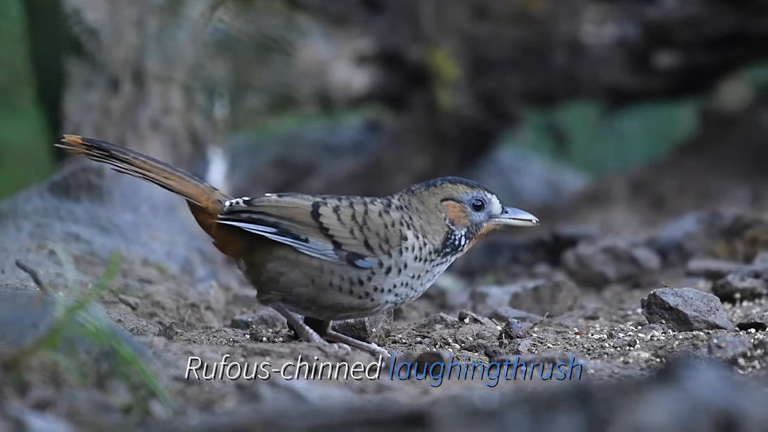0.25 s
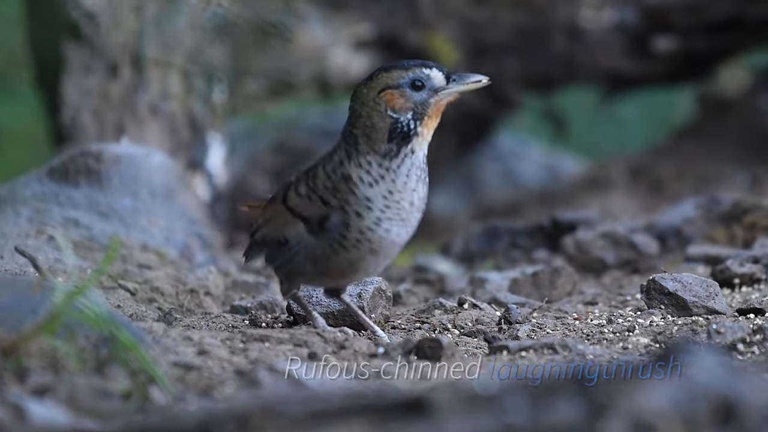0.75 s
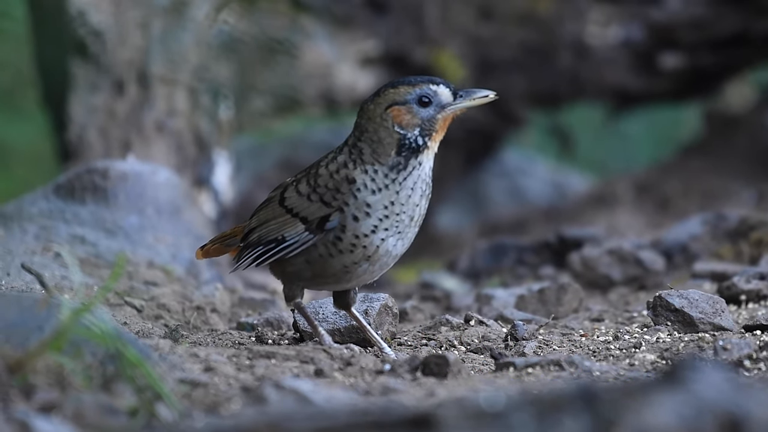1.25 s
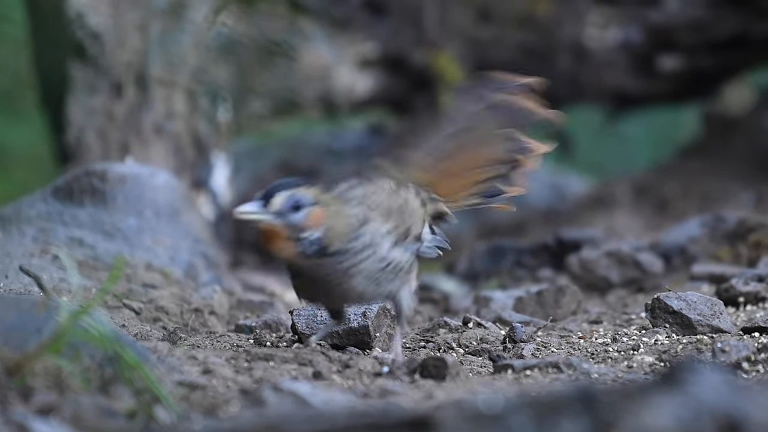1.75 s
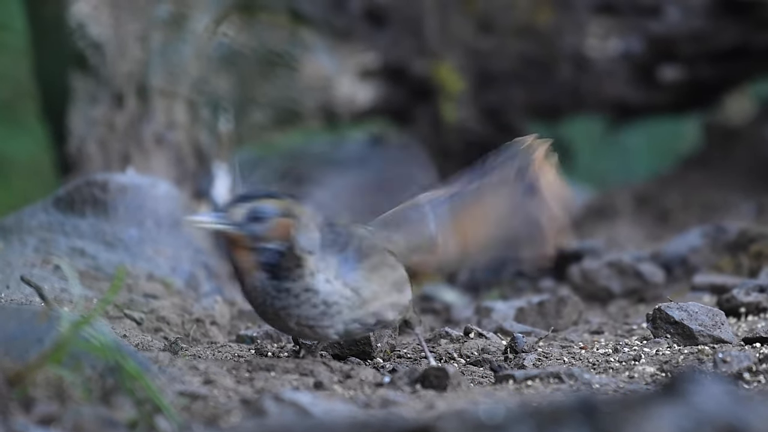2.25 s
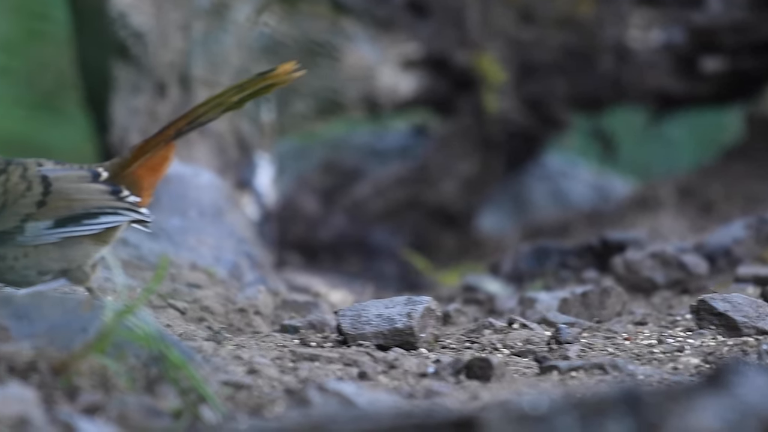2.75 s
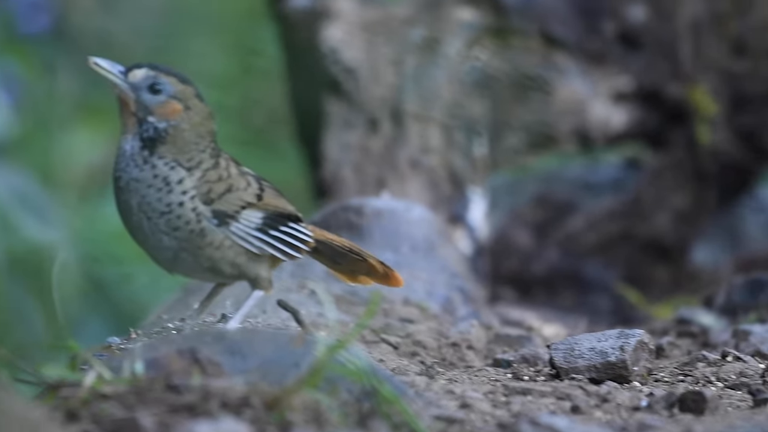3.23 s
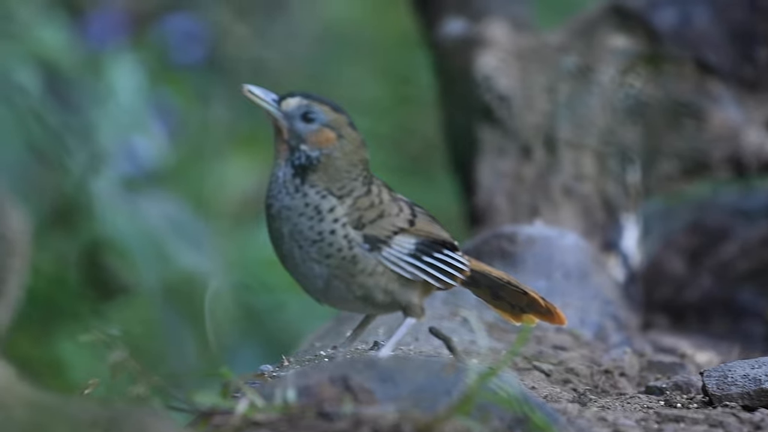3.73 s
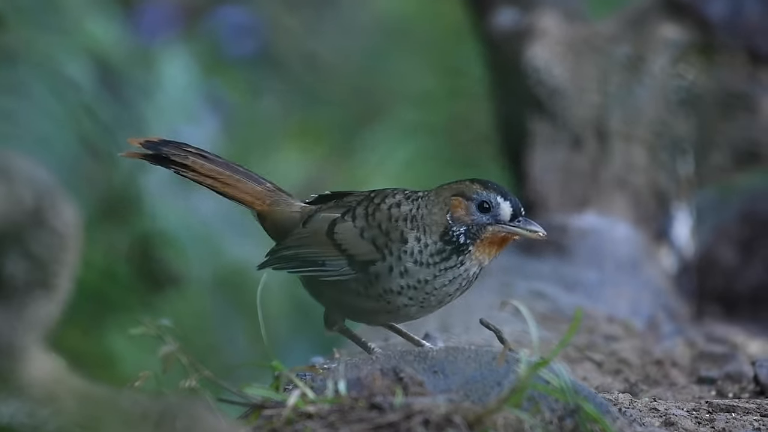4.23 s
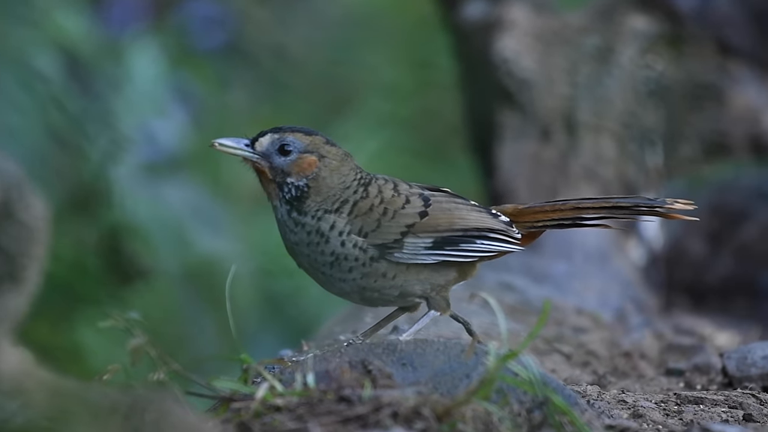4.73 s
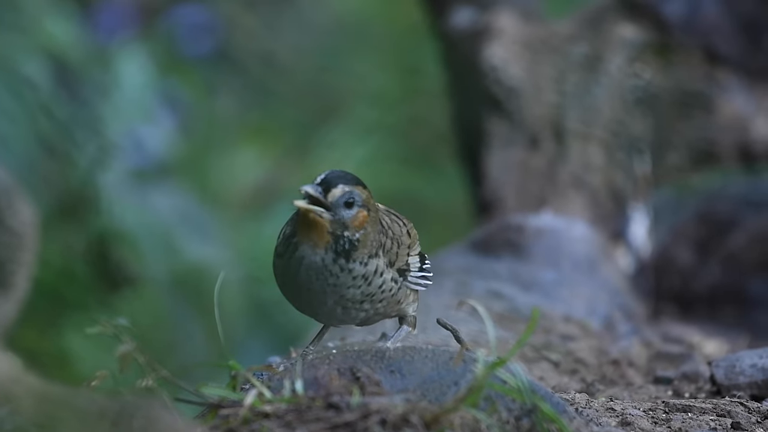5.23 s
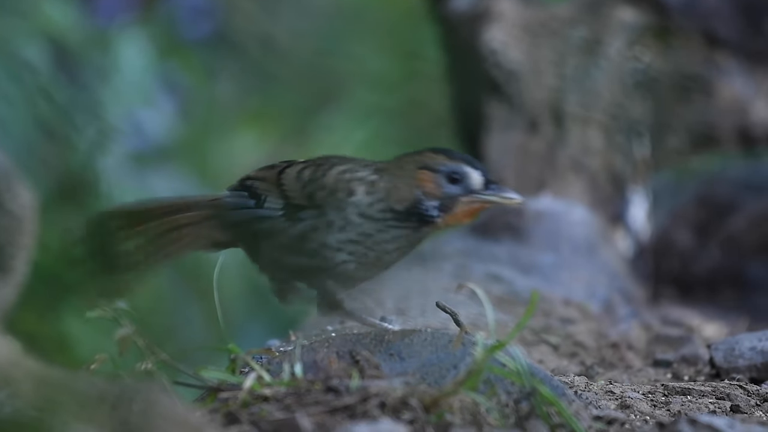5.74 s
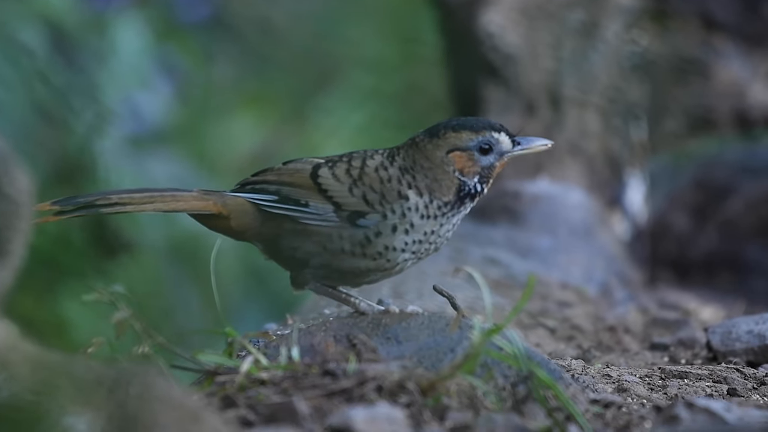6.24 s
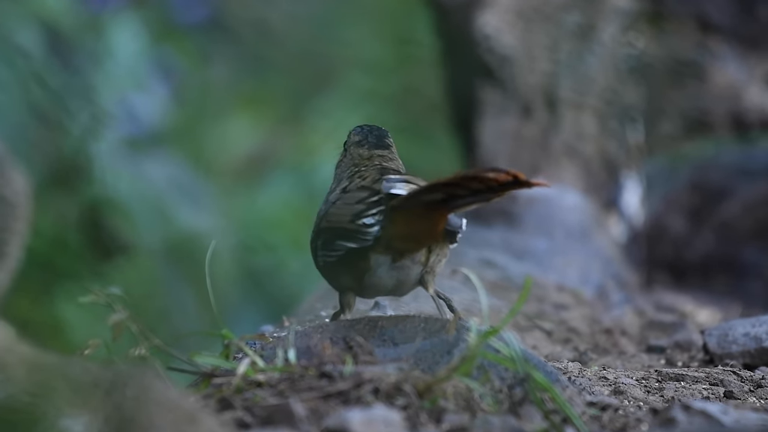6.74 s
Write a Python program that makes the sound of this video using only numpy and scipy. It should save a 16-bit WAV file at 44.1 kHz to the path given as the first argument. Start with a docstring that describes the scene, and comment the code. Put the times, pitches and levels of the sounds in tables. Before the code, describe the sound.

Close outdoor stereo sound of a scolding bird on stony ground. Nasal, grating buzzes of about a fifth of a second come in a bout of four, then after a gap a run of seven or more. Between and around them another bird answers with quick warbling trills that open into a hiss. Wings puff softly, grit scuffs, small stones tick, and dull hollow knocks sit under a faint murmur and hum.

```python
"""Scolding laughingthrush in a wood

A laughingthrush on stony ground scolds in bouts of harsh buzzing calls: pulse trains and gated turbulence, shaped by
the resonances of the throat. A second bird answers with trills, a flicked whistle beside a climbing band of noise;
gliding tones whistle far off. Feet scuff grit (dense noise grains), pebbles and small ticks ring (decaying modes),
wings thump (puffs of noise and tone), and hollow knocks (single modes) sound over filtered air noise and a low hum.
"""
import sys
import numpy as np
from scipy import signal
from scipy.fft import rfft, irfft, next_fast_len
from scipy.io import wavfile
from scipy.ndimage import uniform_filter1d, map_coordinates

SR = 44100
rng = np.random.default_rng(int(sys.argv[2]) if len(sys.argv) > 2 else 0)


def wav_out(sig):
    """Save sig, one row per channel (or a flat mono array), as 16-bit PCM at SR to the path in sys.argv[1]."""
    wavfile.write(sys.argv[1], SR, np.round(np.clip(np.atleast_2d(sig).T, -1, 1) * 32767).astype(np.int16))


N = 307818
T = np.arange(N) / SR  # time of every sample, s

# Scolding calls, one row each. The tops lie at a share (0-1) of the length, held within 0.1-0.9.
# start_s, length_s, top_rate_hz (pulses), start_sag_hz, end_sag_hz, rate_top_share, loudest_share,
# main_db, upper_db, middle_db, low_db, overtones_db (relative band levels),
# brightening_db (change of the upper band over the call), shoulder_db (against the middle band)
SCOLDING_CALLS = [(-.2, 0.24, 141.9, 22.8, 16, 0.52, 0.53, -28.5, -27.5, -39, -47, -46, -3, 3.2),
                  (1.097, 0.25, 140.5, 15.3, 9.66, 0.62, 0.78, -28, -23.5, -36, -40, -45, -2.5, 3.7),
                  (1.43, 0.22, 138.9, 25.6, 16.8, .54, 0.66, -28, -25.5, -37.5, -43, -46, -5.5, 2.3),
                  (1.772, 0.2, 142.9, 17.2, 9.73, 0.65, 0.73, -29, -30.5, -40.5, -43, -48.5, 0, 3),
                  (2.097, 0.2, 146.7, 23.8, 18, 0.58, .55, -29.5, -30, -39.5, -45, -47, 0, 3),
                  (4.249, 0.23, 138.9, 24, 10, 0.62, 0.93, -43, -27, -32.5, -40.5, -46, -6.5, 0.65),
                  (4.554, 0.22, 138.9, 24.2, 17.8, 0.66, 0.66, -37, -28.5, -35, -41, -45, -3.5, 2.04),
                  (4.876, 0.21, 136.5, 23, 14.5, 0.59, 0.71, -47, -28.5, -35, -42, -46.5, -2.5, 1),
                  (5.215, .215, 141.4, 25.8, 15, .48, 0.24, -29.5, -33.5, -39.5, -41.5, -46, 5, 2),
                  (5.611, .229, 148.9, 23, 11.84, .64, 0.84, -36, -35, -41.5, -41.5, -48, 10.5, 4.12),
                  (5.948, 0.21, 147.3, 21.6, 19.5, 0.61, 0.66, -36.5, -30.5, -38.5, -41, -47.5, 1, 3.9),
                  (6.315, 0.22, 144.6, 33, 17.5, .58, 0.61, -30.5, -25, -34, -47.5, -44.5, 1, 3.04),
                  (6.669, 0.24, 144.6, 29, 11.6, 0.69, 0.68, -27.5, -27, -35.5, -50.5, -45, -1.5, 2.5)]


def amp(db):
    """Amplitude ratio of a level in dB: twenty dB to a factor of ten."""
    return 10 ** (np.asarray(db) / 20)


def unit(x):
    """Normalization to a root-mean-square value of one."""
    return x / np.sqrt(np.mean(x ** 2) + 1e-20)


def along(points, hz):
    """Interpolation of (frequency_hz, value) points along a logarithmic frequency axis."""
    f, v = np.transpose(points)
    return np.interp(np.log(hz + 1), np.log(f + 1), v)


def wobble(rate):
    """Band-limited random modulation: a smooth curve through `rate` random knots a second."""
    knots = rng.standard_normal(int(N * rate / SR) + 4)
    return map_coordinates(knots, [T * rate])


def filtered(x, response):
    """Linear filtering: the spectrum of x times a complex response of frequency."""
    m = next_fast_len(N + SR // 2)
    return irfft(rfft(x, m) * response(np.fft.rfftfreq(m, 1 / SR)), m)[..., :N]


def causal(gain):
    """Minimum-phase response with this gain, by folding the cepstrum onto positive times."""
    c = irfft(np.log(gain + 1e-6))
    c[1:len(c) // 2] *= 2
    c[len(c) // 2 + 1:] = 0
    return np.exp(rfft(c))


def bell(hz, centre_hz, width_hz):
    """Lorentzian power curve of a single damped resonance."""
    return 1 / (1 + (2 * (hz - centre_hz) / width_hz) ** 2)


def add(out, s, sound, pan_db):
    """Stereo placement by level difference: left over right is pan_db."""
    part = out[:, round(s * SR):][:, :len(sound)]
    part += amp([[pan_db / 2], [-pan_db / 2]]) * sound[:part.shape[1]]


def scattered(x, t60, channels):
    """Near-field scattering: x convolved with a short burst of decaying noise."""
    t = np.arange(SR // 20) / SR
    tail = rng.standard_normal((channels, len(t))) * amp(-60 * t / t60)
    return signal.fftconvolve(x[None], tail / np.linalg.norm(tail[0]), axes=1)[:, :N]


def echoes(x, delay_s):
    """Reverberation: trunks and rocks scatter the sound, and each frequency decays at its own speed."""
    # Decay of the wood: frequency_hz, t60_s
    decay_times = [(500, 0.68), (2200, 0.44), (6000, 0.54), (12000, 0.68)]
    hz, t, z = signal.stft(rng.standard_normal((2, SR // 2)), SR, nperseg=256)
    decay = amp(-60 * t / along(decay_times, hz)[:, None])
    tail = signal.istft(z * decay, SR, nperseg=256)[1]
    delayed = np.pad(x, (round(delay_s * SR), 0))
    return signal.fftconvolve(delayed[None], tail / np.linalg.norm(tail[0]), axes=1)[:, :N]


def murmur(level_db=-61, patchy_db=.8):
    """Diffuse field: the wood's noise is coherent between the two ports only in the bass."""
    # Spectrum of the murmur: frequency_hz, level_db (relative)
    spectrum = [(25, -24), (40, -8.5), (107, -4.5), (180, -11), (267, -6.5), (400, -13), (600, -11.5),
                (1100, -18), (3000, -22.5), (6800, -28.5), (8500, -40), (12000, -36), (15700, -47)]
    # Coherence of the ports: frequency_hz, left_right_likeness (-1 to 1)
    likeness = [(60, 0.97), (190, 0.9), (620, 0.49), (1980, 0.1), (6370, 0.057)]
    z = signal.stft(rng.standard_normal((2, N)), nperseg=512)[2]
    # smoothed over frequency, then over time
    field = uniform_filter1d(rng.standard_normal(z.shape[1:]), size=6, axis=0)
    field = uniform_filter1d(field, size=14, axis=1)
    pair = signal.istft(z * amp(patchy_db * unit(field)), nperseg=512)[1][:, :N]

    def mid_side_gains(f):
        angle = np.arccos(np.clip(along(likeness, f), -1, 1)) / 2
        return amp(along(spectrum, f)) * [np.cos(angle), np.sin(angle)]

    mid, side = filtered(pair, mid_side_gains)
    return amp(level_db) * np.array([mid + side, mid - side]) / np.std(mid)


def low_hum():
    """Narrow-band noise: a resonance passes a low hum whose level wavers slowly."""
    # Hum: centre_hz, width_hz, level_db (mean)
    hum_bands = [(119.2, 13, -66.5)]
    hum = np.zeros(N)
    for centre_hz, width_hz, db in hum_bands:
        band = filtered(rng.standard_normal(N), lambda f: bell(f, centre_hz, width_hz))
        hum += amp(db + wobble(0.71)) * unit(band)
    return hum


def far_birds():
    """Frequency glides: short pure whistles, with a quaver on those that fall through 3200 Hz."""
    # Far whistles: start_s, end_s, start_pitch_hz, end_pitch_hz, level_db (relative)
    whistles = [(.5, 0.62, 3210, 3040, -69), (3.098, 3.133, 4780, 5000, -68),
                (3.43, 3.491, 5460, 5300, -73), (3.489, 3.547, 4980, 4410, -74),
                (3.51, 3.545, 5300, 4900, -74), (3.564, 3.602, 8200, 7850, -91),
                (3.566, 3.607, 3500, 3070, -63), (3.57, 3.625, 2740, 2750, -72),
                (3.61, 3.636, 7700, 6200, -69), (3.688, 3.706, 7000, 7250, -68),
                (3.883, 3.92, 6700, 6400, -79), (3.976, 4.001, 6960, 6600, -75)]
    voice = np.zeros((2, N))
    for start, end, first_hz, last_hz, db in whistles:
        u = np.linspace(0, 1, round((end - start) * SR))
        pitch_hz = first_hz + (last_hz - first_hz) * u ** 1.5
        if last_hz < 3200 < first_hz:
            pitch_hz = pitch_hz + 120 * np.sin(2 * np.pi * 90 * (end - start) * u)
        tone = np.sin(2 * np.pi * np.cumsum(pitch_hz) / SR)
        add(voice, start, amp(db + 3.5) * np.sin(np.pi * u) * tone, 0)
    return voice + amp(-13) * echoes(voice[0], delay_s=0.01)


def hollow_knocks():
    """Modal decay: each knock is one hollow mode with a softened start."""
    # Knocks: start_s, level_db (relative), pitch_hz, t60_s
    knock_rows = [(0.019, -51, 205, 0.25), (0.533, -48.5, 210, 0.15), (0.869, -50, 215, 0.29),
                  (1.161, -47.5, 210, 0.26), (1.449, -47, 217, 0.27), (1.713, -47.5, 213.2, 0.16),
                  (1.969, -45.5, 213.5, 0.098), (2.686, -49, 217, 0.24), (2.96, -48.5, 214, 0.17),
                  (3.159, -50.5, 810, 0.07), (3.273, -40, 850, 0.022), (6.5047, -36, 1031, 0.16),
                  (6.5591, -54, 1018, 0.12)]
    out, t = np.zeros((2, N)), np.arange(SR // 2) / SR
    for s, db, hz, t60 in knock_rows:
        envelope = amp(db + 1.5 - 60 * t / t60) * (1 - np.exp(-t / 0.0012))
        add(out, s, envelope * np.sin(2 * np.pi * hz * t), -1)
    return out


def wing_beats():
    """Displaced air: each beat pushes a soft puff, heard as a decaying low tone with band noise."""
    # Beats: time_s, level_db (relative), pitch_hz
    beat_rows = [(2.279, -48.5, 519), (2.309, -48.5, 254.6), (2.35, -48, 500), (2.38, -46, 543),
                 (2.399, -47, 527.6), (3.763, -50, 356), (3.805, -49, 252), (4.175, -38, 363.6),
                 (4.195, -35.5, 503), (5.218, -37.5, 288), (5.235, -46, 282.7), (5.257, -47, 211.5)]
    out, t = np.zeros((2, N)), np.arange(SR // 2) / SR
    puff_band = signal.butter(3, [120, 600], "band", fs=SR, output="sos")
    for s, db, hz in beat_rows:
        puff = unit(signal.sosfilt(puff_band, rng.standard_normal(len(t))))
        envelope = amp(db + 4 - 60 * t / 0.07) * (1 - np.exp(-t / 0.009))
        add(out, s - .004, envelope * (np.sin(2 * np.pi * hz * t) + 0.9 * puff), -1)
    return out


def ticks():
    """Shared modes: every tick rings one set of resonances, with a brief noisy rattle."""
    # Ticks: start_s, level_db (relative), left_right_db
    tick_rows = [(3.8647, -34, 10), (3.913, -41, -3), (3.9457, -36.5, 3.5), (4.01, -30.5, 9.5),
                 (4.0928, -38.5, 25), (4.1391, -30, 14), (4.175, -30, 10), (4.1996, -30, 7)]
    # Modes of a tick: pitch_hz, level_db (relative), t60_s
    modes = [(4610, 10.5, 0.026), (5570, 3.5, 0.025), (5950, 6.5, 0.016), (11450, -21, 0.0092)]
    out, t = np.zeros((2, N)), np.arange(SR // 8) / SR
    for s, db, pan in tick_rows:
        ring = np.zeros(len(t))
        for hz, mode_db, t60 in modes:
            ring += amp(mode_db - 60 * t / t60) * np.sin(2 * np.pi * (hz * t + rng.random()))
        rattle = signal.lfilter([1, 0, -1], [1, -1.1, .6], rng.standard_normal(len(t)))
        rattle = rattle * amp(-60 * t / .022)
        add(out, s, amp(db - 17) * (0.92 * ring + 0.11 * rattle), pan)
    return out


def pebbles():
    """Impact excitation: knocked stones crack and ring for a moment in two inharmonic modes."""
    # Pebbles: start_s, level_db (relative), ring_hz, left_right_db
    pebble_rows = [(1.0526, -35, 5140, 20), (2.547, -38, 4900, 6), (2.635, -38.5, 5860, -5),
                   (2.644, -37, 5430, 5), (2.6588, -48, 2320, -25), (2.6943, -40.5, 2080, -18),
                   (2.7366, -44, 4630, -8), (2.763, -47, 2340, -26), (2.77, -39.5, 5900, -9),
                   (2.7874, -44, 5470, -11), (2.816, -51, 2340, -20), (2.8314, -49, 5430, -4.5),
                   (2.9, -52, 2390, -10), (2.9091, -44.5, 2200, -25.5), (3.0053, -36, 2070, -14),
                   (3.1173, -47.5, 1660, -21), (3.2766, -44.5, 3730, -9), (3.4031, -44, 4950, 12),
                   (3.7641, -40, 1834, -10), (5.201, -31.5, 3910, -11), (5.2385, -16, 4047, -8.5)]
    overtone_ratio, overtone_db = 1.33, -1  # second mode over the first
    out, t = np.zeros((2, N)), np.arange(SR // 8) / SR
    for s, db, hz, pan in pebble_rows:
        crack = signal.lfilter([1, 0, -1], [1, -1.1, .5], rng.standard_normal(len(t)))
        crack = crack * amp(-60 * t / 0.014)
        ring = np.sin(2 * np.pi * hz * t) + amp(overtone_db) * np.sin(2 * np.pi * overtone_ratio * hz * t)
        add(out, s, amp(db) * (0.077 * crack + ring * amp(-60 * t / 0.0076)), pan)
    return out


def hits():
    """Superposition of direct and reverberant sound for the pebbles and the ticks."""
    out = pebbles() + ticks()
    return out + amp(-18) * echoes(out.mean(0), delay_s=.002)


def scuffs(spiky_db=3):
    """Granular friction: feet drag through grit, a dense spray of tiny unequal grains."""
    # Scuffs: loudest_s, level_db, rise_db_per_s, fall_db_per_s
    scuff_rows = [(2.575, -52.5, 1500, 110), (2.637, -50, 1500, 190), (2.695, -46, 900, 900),
                  (2.736, -50.5, 2500, 480), (2.763, -46.5, 2000, 200), (3.404, -45.5, 2500, 520),
                  (3.72, -50, 3004, 60), (3.775, -50, 208, 170)]
    # Spectrum of grit: frequency_hz, level_db (relative)
    spectrum = [(400, -22), (700, -22), (1100, -21.5), (2000, -10), (2600, -19), (5300, -12.5), (6900, -15),
                (8800, -29.5), (11000, -36.5), (15700, -48)]
    level = sum(amp(db - np.where(T < s, rise * (s - T), fall * (T - s))) for s, db, rise, fall in scuff_rows)
    shared, left, right = rng.standard_normal((3, N))
    unevenness = amp(spiky_db * wobble(500) + 2.2 * wobble(60))
    grains = (shared + 3 * np.array([left, right])) * unevenness
    return level * unit(filtered(grains, lambda f: amp(along(spectrum, f))))


def breath_gate(t, length, attack_s, release_db_per_s):
    """Exponential onset and decay: opens fast at t = 0, holds, then dies away."""
    return (1 - np.exp(-np.maximum(t, 0) / attack_s)) * amp(-release_db_per_s * np.maximum(t - length, 0))


def trill_controls():
    """Articulation: the opening beak lifts and strengthens the rasp while the flicks slow down."""
    # Trills; a positive settling_db weakens the warble away from its accent, a negative one strengthens it:
    # start_s, length_s, warble_db (relative), settling_db, start_pitch_hz (before scoop and flicks),
    # flick_rate_hz (at the start), first_flick_head_start (0-1), rasp_db (relative, beak open), opening_s
    trill_rows = [(0.246, 0.25, -49.5, 3, 1797, 51.5, 0.24, -49.5, 0.2),
                  (0.747, .329, -43, 7.5, 2008, 58.6, .45, -43.5, 0.23),
                  (2.309, 0.24, -37, 9, 1956, 48, 0.36, -45.5, .25),
                  (3.115, 0.22, -45, 7, 1792, 50.5, 0.3, -46, 0.36),
                  (3.883, 0.29, -43, 9, 1888, 48.4, 0.23, -50, .26),
                  (5.118, .095, -42, -2, 1949, 57.2, 0.35, -37, 0.26),
                  (6.581, 0.094, -43.5, -4, 1993, 46.6, 0.46, -53, .25)]
    attack_s, release_db_per_s = 0.011, 900
    warble_top_hz, climb_s = 2255, .15
    scoop_hz, scoop_s = 398, .012  # the warble slides up into its first pitch
    rasp_shut_hz, rasp_open_hz, rasp_shut_loss_db = 2707, 4925, 26  # band centres and level by beak
    slowing_per_s2 = 20  # the flick rate falls by this many a second, every second
    accent_at_s, accent_s = .035, 0.063
    out = np.zeros((5, N)) + [[0], [0], [rasp_shut_hz], [warble_top_hz], [0]]
    for start, length, warble_db, settle_db, first_hz, rate, head, rasp_db, open_s in trill_rows:
        near = (T > start) & (T < start + length + .05)
        t = T[near] - start
        gate = breath_gate(t, length, attack_s, release_db_per_s)
        beak = np.minimum(t / open_s, 1)
        away_from_accent = 1 - np.exp(-((t - accent_at_s) / accent_s) ** 2)
        warble_gain = gate * amp(warble_db - settle_db * away_from_accent)
        rasp_gain = gate * amp(rasp_db - rasp_shut_loss_db * (1 - beak) ** 2)
        rasp_hz = rasp_shut_hz + (rasp_open_hz - rasp_shut_hz) * beak
        warble_hz = warble_top_hz - (warble_top_hz - first_hz) * np.exp(-t / climb_s)
        warble_hz -= scoop_hz * np.exp(-t / scoop_s)
        flicks = head + rate * t - slowing_per_s2 * t ** 2 / 2
        out[:, near] = [warble_gain, rasp_gain, rasp_hz, warble_hz, flicks]
    return out


def trill(swing=0.31, rasp_width_hz=1150):
    """Two-voiced syrinx: one side flicks a rough whistle up and down, the other rasps in a climbing band."""
    warble_gain, rasp_gain, rasp_hz, warble_hz, flicks = trill_controls()
    opening = np.clip((rasp_hz - 2800) / 2000, 0, 1)
    flick = np.sin(np.pi * flicks) ** 2

    pitch_hz = warble_hz * (1 + swing * (.8 + .45 * opening) * (flick ** 2 - .6)) + 100 * wobble(400)
    whistle = np.sin(2 * np.pi * np.cumsum(pitch_hz) / SR)
    hoarse = filtered(rng.standard_normal(N), lambda f: bell(f, 0, 1800) ** 2)
    rough_whistle = amp(1.6 * wobble(150)) * (0.72 + 0.29 * unit(hoarse)) * whistle
    warble = (0.46 + 1.34 * flick ** 1.12) * unit(rough_whistle)

    # low-pass noise on two quadrature carriers makes a noise band around rasp_hz
    a, b = filtered(rng.standard_normal((2, N)),
                    lambda f: bell(f, 0, rasp_width_hz) ** 2 + 0.58 * bell(f, 0, 8200) ** 3)
    turn = 2 * np.pi * np.cumsum(rasp_hz) / SR
    noise_band = a * np.cos(turn) + b * np.sin(turn)
    rasp = filtered(noise_band * (0.95 + 0.34 * flick), lambda f: 1 - bell(f, 0, 3300))

    voice = warble_gain * warble + rasp_gain * unit(rasp)
    direct = amp(-6.5) * voice * amp([[-1], [1]])  # 2 dB stronger on the right
    near = amp(-12) * scattered(voice, 0.03, channels=2)
    dulled = filtered(voice, lambda f: 1 - 0.57 * bell(f, 0, 6400) ** 2)
    return direct + near + amp(-5.0) * echoes(dulled, delay_s=0.0023)


def arch(u, top, first, last):
    """Parabolic contour: zero at the top, fallen by first at u = 0 and by last at u = 1."""
    top = np.clip(top, .1, .9)
    return -np.where(u < top, first * ((top - u) / top) ** 2, last * ((u - top) / (1 - top)) ** 2)


def call_controls():
    """Breath and tension: the pulse rate and the gain of each band arch over every call."""
    # Rows: main, upper, middle, low band, clean overtones
    # start_drop_db, end_drop_db (below the loudest point)
    swells = [(12.5, 8.3), (7.5, 7.2), (2.5, 4.5), (2, 3), (3, 4.9)]
    attack_s, release_db_per_s = 0.005, 727
    onset_db, onset_s = 5.5, 0.021  # after the sharp start the voice still gains this much
    rate_hz, gains, shoulder_db = np.full(N, 126.), np.zeros((len(swells), N)), np.zeros(N)
    for row in SCOLDING_CALLS:
        start, length, top_hz, first_sag_hz, last_sag_hz, top, loudest, *levels_db, bright_db, above_db = row
        near = (T > start - .02) & (T < start + length + .06)
        t = T[near] - start
        u = np.clip(t / length, 0, 1)
        rate_hz[near] = top_hz + arch(t / length, top, first_sag_hz, last_sag_hz)
        shape_db = np.array([db + arch(u, loudest, *swell) for db, swell in zip(levels_db, swells)])
        shape_db[1] += bright_db * (u - .5)
        shape_db -= onset_db * np.exp(-np.maximum(t, 0) / onset_s)
        shoulder_db[near] = above_db
        gains[:, near] += amp(shape_db) * breath_gate(t, length, attack_s, release_db_per_s)
    return rate_hz, gains, shoulder_db


def syrinx_claps(cycles, jitter_s=.00005):
    """Pulse excitation: the syrinx claps shut once a cycle, and its membranes rebound twice."""
    at = np.flatnonzero(np.diff(np.floor(cycles)))
    jitter = np.round(jitter_s * SR * rng.standard_normal(len(at))).astype(int)
    claps = np.zeros(N)
    claps[np.clip(at + jitter, 0, N - 1)] = 1

    def rebound(f):
        # two weaker, brighter claps follow inside each cycle
        later = 0.59 * np.exp(-2j * np.pi * f * 0.0028) + 0.78 * np.exp(-2j * np.pi * f * 0.0042)
        return 1 + later * f ** 6 / (f ** 6 + 840.0 ** 6)

    return filtered(unit(claps), rebound)


def turbulent_air(cycles, edge_hz=1900):
    """Modulated jet noise: turbulence surges once a cycle and blurs the upper bands."""
    air = rng.standard_normal(N) * (1.0 + np.exp(-2.5 * (cycles % 1)))
    return filtered(unit(air), lambda f: f ** 4 / (f ** 4 + edge_hz ** 4))


def vocal_tract(source):
    """Source-filter principle: throat and windpipe resonances shape the source, split here into five bands."""
    # Throat: frequency_hz, level_db (relative)
    throat_gain = [(600, -37), (820, -33.5), (1350, -23), (1700, -12), (2020, -12.5), (2300, -6.5),
                   (2900, -17.5), (4100, -29.5), (4900, -18), (5250, -6), (6500, -7.5), (7200, -24),
                   (11500, -35.5), (15700, -47)]
    # Windpipe resonances: centre_hz, width_hz, level_db
    resonances = [(2258, 180, 10.5), (2613, 170, 4), (1845, 30, 4), (3110, 65, 0.5), (5853, 720, 7),
                  (6140, 126, -0.5)]

    def tract(f):
        pipe_db = sum(db * bell(f, c, w) for c, w, db in resonances)
        return causal(amp(along(throat_gain, f) + pipe_db))

    def bands(f):
        above = [1 - 1 / (1 + (f / edge_hz) ** 12) for edge_hz in (1900, 2450, 3000, 4400)]
        return np.diff([1 + 0 * f, *above, 0 * f], axis=0)

    return filtered(source, lambda f: tract(f) * bands(f))


def clean_overtones(rate_hz, cycles):
    """Harmonic series: the lowest overtones escape the turbulence and stay clean lines."""
    # Overtone levels: frequency_hz, level_db (relative)
    overtone_levels = [(640, -34), (780, -12), (960, -6), (1110, 0), (1260, -7), (1400, -16), (1600, -5),
                       (1800, -8), (2000, -30)]
    pure = np.zeros(N)
    for k in range(5, 15):
        gain = amp(along(overtone_levels, k * rate_hz) + 2 * wobble(25))
        pure += gain * np.sin(2 * np.pi * (k * cycles + rng.random()))
    return pure


def scold_paths(voice):
    """Multipath propagation: direct sound, scattering by close stones, and echoes of the wood."""
    # Balance: frequency_hz, left_right_db
    lean = [(300, 2), (1350, -3), (2260, -6.5), (3800, 1.5), (6000, -6.5), (9000, -26.5)]
    # Direct path: frequency_hz, level_db
    direct_gain = [(800, -3), (2500, -3.5), (4000, -5), (6000, -9.5), (9000, -7), (13000, -32)]
    # Path by the stones: frequency_hz, level_db
    stone_gain = [(800, -19), (1500, 2), (2400, -13), (4000, -5.5), (6000, -2.5), (9000, 4.5), (13000, -16)]
    direct = filtered(voice, lambda f: amp(np.outer([.5, -.5], along(lean, f)) + along(direct_gain, f)))
    # stones scatter the short waves, differently for each port and, as the bird shifts, for each call
    short = filtered(voice, lambda f: amp(along(stone_gain, f)))
    which = np.searchsorted([row[0] for row in SCOLDING_CALLS], T)
    close = sum(scattered(short * (which == k + 1), 0.081, channels=2) for k in range(len(SCOLDING_CALLS)))
    return direct + close + amp(-12) * echoes(voice, delay_s=0.0046)


def scold(breath=1.86):
    """Syringeal phonation: claps and breath noise excite the throat, and the bands swell apart."""
    rate_hz, gains, shoulder_db = call_controls()
    rate_hz = rate_hz * (1 + .003 * wobble(40))
    cycles = np.cumsum(rate_hz) / SR
    source = syrinx_claps(cycles) + breath * turbulent_air(cycles)
    low, main, shoulder, middle, upper = vocal_tract(source)
    pure = clean_overtones(rate_hz, cycles)
    middle = unit(middle) + amp(shoulder_db) * unit(shoulder)
    voice = np.sum(gains * [unit(main), unit(upper), middle, unit(low), unit(pure)], axis=0)
    return scold_paths(voice)


def scene():
    """Linear superposition of all the sources."""
    background = murmur() + low_hum() + far_birds()
    ground = hollow_knocks() + wing_beats() + hits() + scuffs()
    return background + ground + trill() + scold()


def record(dry):
    """Destructive interference: the microphone housing cancels two narrow bands; a band limit follows."""
    # Cancelled bands: centre_hz, width_hz
    notches = [(7670, 810), (9680, 1030)]
    top_hz = 15750

    def holes(f):
        return np.prod([1 - 0.9 * np.exp(-((f - c) / w * 2) ** 4) for c, w in notches], axis=0)

    return filtered(dry, lambda f: holes(f) * (f < top_hz))


dry = scene()
out = record(dry)
wav_out(out)
```